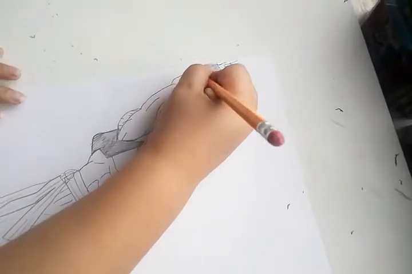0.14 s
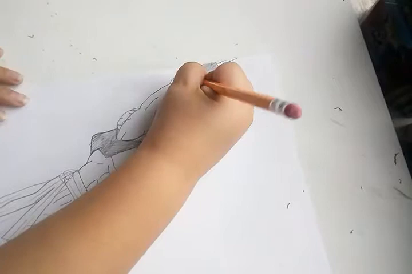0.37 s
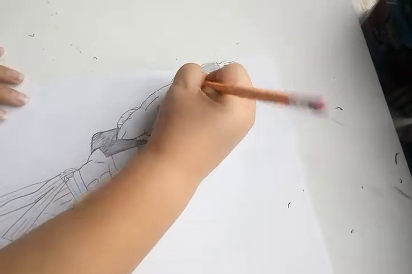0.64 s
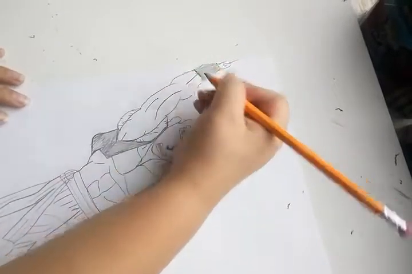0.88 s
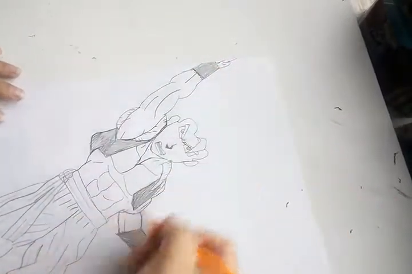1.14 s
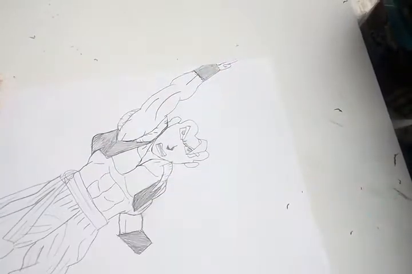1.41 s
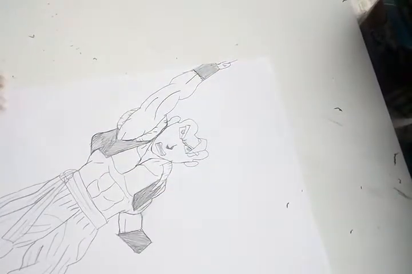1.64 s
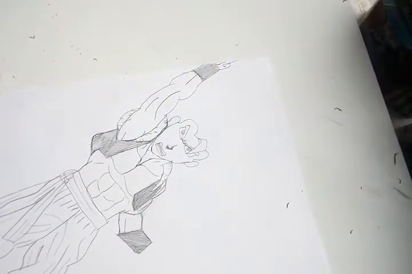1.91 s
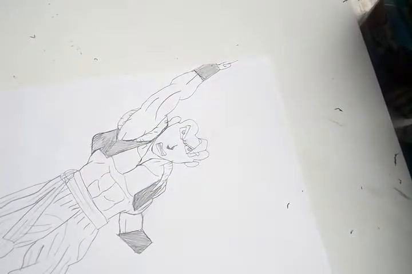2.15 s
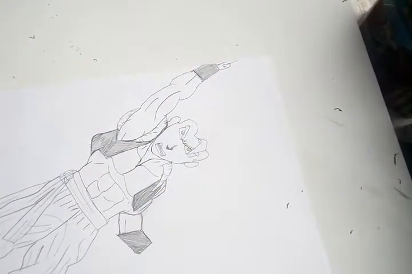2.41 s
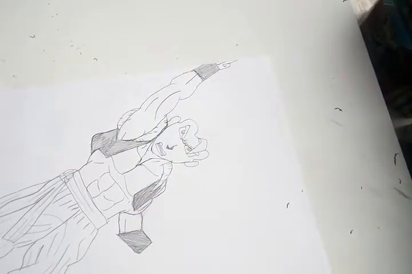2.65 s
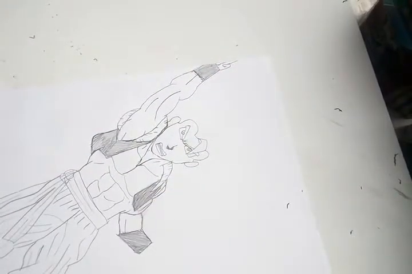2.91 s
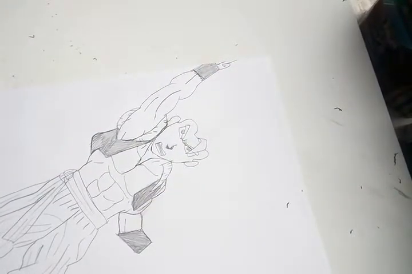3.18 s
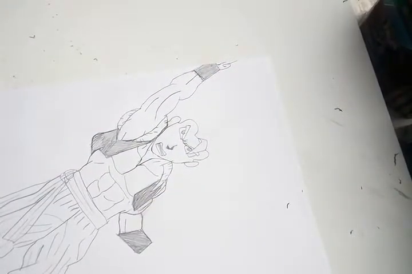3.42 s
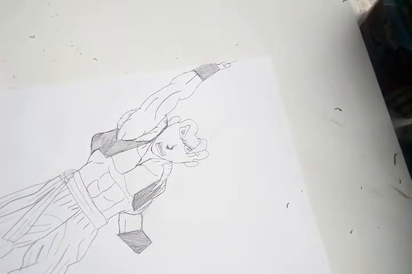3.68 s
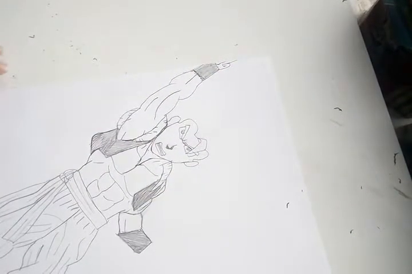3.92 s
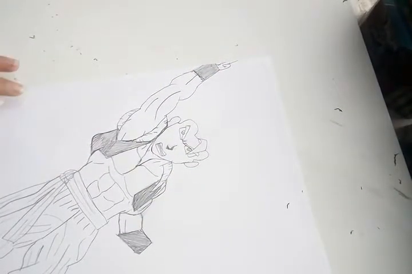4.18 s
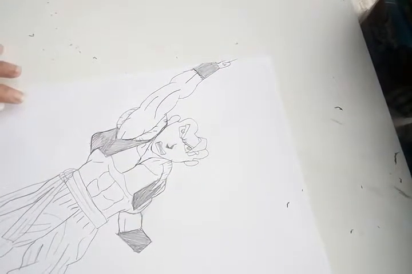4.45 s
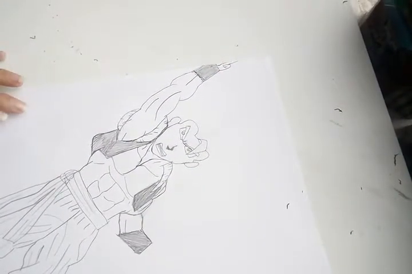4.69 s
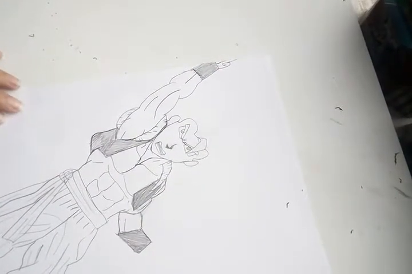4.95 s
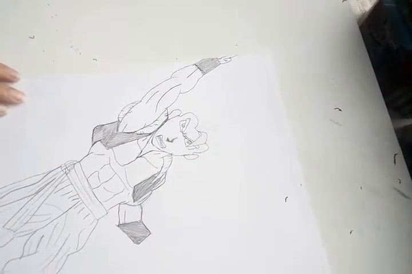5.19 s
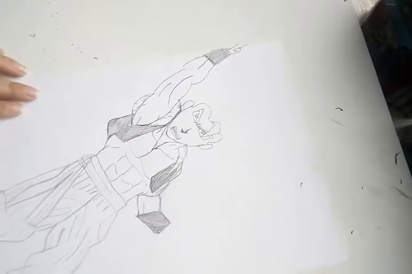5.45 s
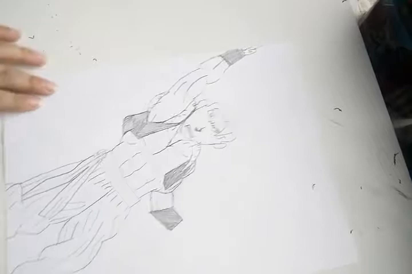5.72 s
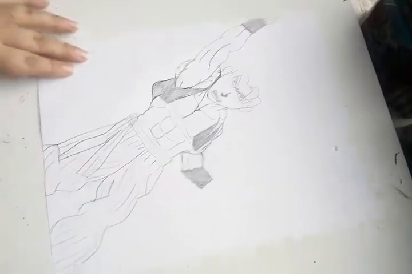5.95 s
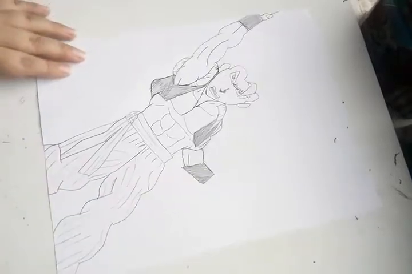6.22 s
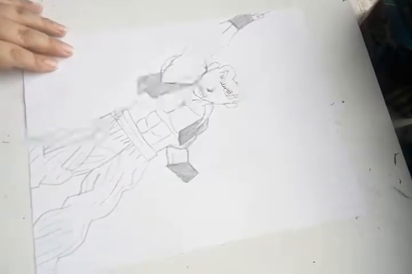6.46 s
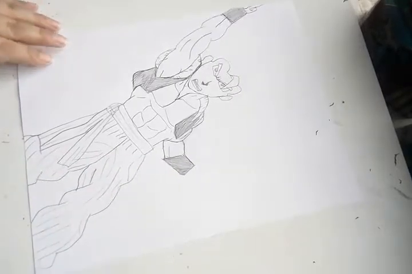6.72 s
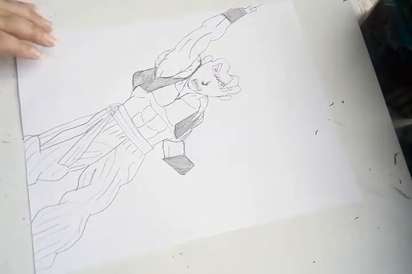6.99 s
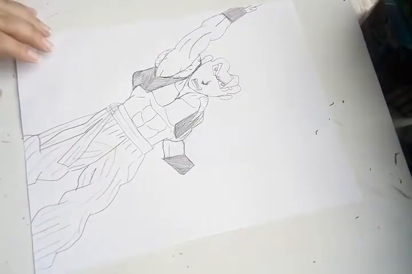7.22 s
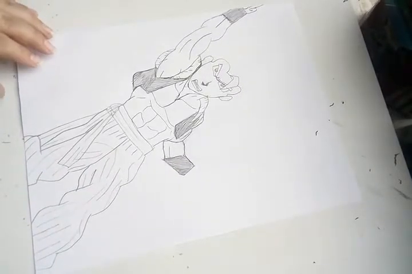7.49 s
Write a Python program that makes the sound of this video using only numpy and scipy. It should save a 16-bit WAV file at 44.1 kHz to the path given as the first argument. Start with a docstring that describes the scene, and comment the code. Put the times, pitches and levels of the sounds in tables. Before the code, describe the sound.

A quiet indoor room with low hum and faint hiss, microphone close above a desk. Soft papery rubbing comes first, then a small tap and a long near-silence. A sudden bright clatter of hard taps follows, with light rubbing, then scuffs and a burst of dull, heavy thuds and rumble as the camera is moved. The thuds weaken, leaving a small click-scuff and quiet.

```python
"""A quiet room, with the microphone in a camera housing close above a desk.
Room hum and rush and microphone hiss are shaped steady noise. A hand slides over drawing paper (friction
noise) and an arm drags on the desk (low resonances shaken by noise). A pencil and other small hard things
tap and clatter: bursts of contact noise that ring the thing and thump the desk. While the housing is shifted
it thuds in low jolts over a rumble, carried straight through the camera body."""
import sys
import numpy as np
from scipy import signal
from scipy.fft import rfft, irfft
from scipy.io import wavfile

SR = 44100
rng = np.random.default_rng(int(sys.argv[2]) if len(sys.argv) > 2 else 0)


def invert_db(level):
    """Linear amplitude ratio for a level in decibels (20 dB per decade), elementwise."""
    return 10 ** (np.asarray(level, dtype=float) / 20)


def materialize(psi):
    """Save the field psi as 16-bit PCM at rate SR to the path in sys.argv[1].

    A 1-D psi becomes a single channel; in a 2-D psi each row is a channel.
    """
    bounded = np.clip(np.atleast_2d(psi).T, -1, 1)
    quanta = np.round(bounded * 32767).astype(np.int16)
    wavfile.write(sys.argv[1], SR, quanta)


N = 335601  # length in samples

# Room hum and rush: [f/Hz, relative level/dB]
AIR_SPECTRUM = [(12, -51.5), (20, -35), (43, -2.5), (90, -7.5), (123, 0.5), (161, -10), (243, -10),
                (296, -13.5), (569, -17), (762, -18.5), (903, -20), (6600, -29), (8580, -50), (14500, -120)]
# Microphone hiss: [f/Hz, relative level/dB]
HISS_SPECTRUM = [(3880, -36), (6600, -8.5), (8080, -8.5), (12900, -9), (13600, -10), (15100, 3.5),
                 (16000, -8.5), (16200, -37)]
AIR_DB, HISS_DB = -57.5, -76.5  # rms levels
# The resting arm drags on the desk: [start t/s, length t/s, low resonance level/dB, high resonance level/dB]
ARM_DRAGS = [(.12, 0.57, -54.5, -67), (3.902, 0.25, -76, -56), (4.398, 0.58, -66, -61.5),
             (6.618, 0.3, -65, -61), (7.051, 0.38, -59, -65)]
DRAG_EDGE_S = 0.1
# Reverberation of the room: [f/Hz, time to fall 60 dB t/s]
ROOM_DECAY = [(100, 0.53), (400, 0.31), (2000, 0.33), (5000, 0.27), (8000, 0.22)]
ROOM_DB = -9.5  # reverberation against the direct sound
# Response of the dull microphone port: [f/Hz, gain level/dB]
MICROPHONE_RESPONSE = [(25, -16.5), (70, -1.5), (6500, -1), (7600, -15), (9000, -16.5), (13000, -17),
                       (15000, -11)]

# Strokes of skin over paper:
# [start t/s, length t/s, level halfway/dB, level change from start to end/dB, slide brightness/(dB per octave)]
PAPER_STROKES = [(0.221, .4, -58, 0, -1), (.79, .2, -61, 6, -4.5), (3.802, 0.34, -56, 12, -1.5),
                 (4.297, 0.94, -62.5, -8.5, -2.5), (5.126, 0.35, -56.5, -9.5, -4), (5.679, .14, -59, 3, 3),
                 (5.77, 0.28, -58, -10, 6)]
# Resonances of the sheet under the pencil hand: [f/Hz, width f/Hz, relative level/dB]
SHEET_RESONANCES = [(1000, 470, 7.5), (1510, 62, 8), (2000, 360, 6), (2793, 190, 0.5), (3660, 150, 5),
                    (4570, 170, 4), (5400, 250, -14.5)]
# Hiss of the sheet sliding on the desk: [f/Hz, relative level/dB]
SLIDE_SPECTRUM = [(300, 2), (700, 2.5), (1500, 1), (2700, 4), (4500, 4), (6400, -0.5), (7600, -13.5)]
STROKE_START_S, STROKE_STOP_S = 0.061, 0.043  # the hand speeds up, and stops more suddenly
LIFT_S = 0.7  # the pencil hand lifts off the sheet: strokes that start later ring it less
HELD_DB, FREE_DB = -1, -27  # ring of the sheet over the hiss, before and after that

# Hard taps: [t/s, strike level/dB, ring of the struck thing f/Hz, relative ring level/dB,
# level added to the desk modes below 500 Hz/dB]
HARD_TAPS = [(.571, -55, 1100, 5, -21), (1.2594, -36, 2650, 5, -9), (1.264, -49, 696, 16, -1),
             (2.096, -54, 640, -7, -5), (3.049, -56, 654, -18, -6.5), (3.76, -53.5, 1230, 1, -4),
             (3.982, -49.5, 3480, 7, -5), (3.994, -43, 1610, -12, -2), (4.0495, -17, 2100, -9, -11.5),
             (4.0659, -16, 3030, -6, -15), (4.0694, -17, 1960, 2, -8), (4.126, -16.5, 556, 3.5, -6),
             (4.142, -21.5, 3520, -13, -12.5), (4.1443, -16.5, 500, -6, -20),
             (4.153, -13, 2850, -24, -10.5), (4.221, -38, 2060, 8, 7.5), (4.796, -55.5, 3040, 3, 6.5),
             (4.806, -52.5, 500, 7, 0), (4.884, -54, 715, 6, 3.5), (5.471, -35, 1335, -32, -15),
             (6.204, -49.5, 2019, -7, 10), (6.43, -35.5, 3930, 3.5, -8)]
# Soft, dragging contacts: columns as for the hard taps
SOFT_SCUFFS = [(5.047, -42, 1560, 4, 7), (5.061, -31.5, 785, 1.5, -6), (5.07, -36, 1520, 6.5, -2.5),
               (5.092, -27.5, 397, 3, 1.5), (5.104, -32.5, 607, 5.5, 8.5), (6.439, -40.5, 4030, -11, 9.5),
               (6.452, -32, 2000, -5, -4), (6.463, -33.5, 1910, 2.5, 2), (6.47, -34, 2640, 4.5, 15)]
# Contact crack before its treble tilt: [f/Hz, relative level/dB]
CRACK_SPECTRUM = [(150, -18.5), (300, 1), (500, -0.5), (1000, -6.5), (3400, -9), (6000, -18),
                  (16000, -46.5)]
# Modes of the desk: [f/Hz, relative level/dB, time to fall 60 dB t/s]
DESK_MODES = [(105, 4, 0.11), (248, 1.5, 0.086), (351, -4, 0.088), (442, -6.5, 0.045), (767, -2.5, 0.038),
              (1240, -8.5, 0.024), (1590, -17.5, 0.1), (1980, -13.5, 0.058), (2100, -21, 0.043),
              (3400, -35.5, 0.067)]
# things that ring high crack brightly; heavy blows flatten the contact and dull it
TREBLE_DB, TREBLE_DB_PER_OCTAVE, DULL_DB_PER_DB = -1, 4, 0.29
# first bright touch; strongest where little rings on
TICK_DB, TICK_T60_S, TICK_DB_PER_RING_DB = -14, 0.013, -0.36

# A faint narrow whistle in the rubbing: (start t/s, length t/s, f/Hz, level/dB)
RUBBING_WHISTLE = (4, 1.5, 2746, -72)

# Rumble of the many small jolts while the camera is shifted: [t/s, level/dB]
RUMBLE_LEVEL = [(5.099, -59), (5.148, -27), (5.224, -29), (5.27, -24.5), (5.398, -32), (5.528, -21.5),
                (5.744, -30.5), (6.252, -54.5), (6.349, -53)]
# Sound carried through the camera body: [f/Hz, relative level/dB]
HOUSING_SPECTRUM = [(12, -29.5), (20, -2.5), (103, 9.5), (248, -2), (532, -28), (614, -37), (900, -50.5),
                    (1170, -77), (1980, -120)]
# Strong jolts of the housing: [crest t/s, swell level/dB, f/Hz, time between its -15 dB points t/ms]
HOUSING_JOLTS = [(5.143, -28, 110, 11), (5.164, -17, 129, 5.8), (5.188, -12.5, 200.5, 8.5),
                 (5.206, -15.5, 114.4, 7.7), (5.231, -13, 157, 7.6), (5.266, -18.5, 144, 20),
                 (5.302, -15, 89, 16.5), (5.325, -17, 78, 17), (5.358, -22, 199, 19),
                 (5.383, -13.5, 150, 5.5), (5.409, -9.5, 167, 9), (5.452, -13, 136, 5.8),
                 (5.466, -12, 147, 8.7), (5.586, -15, 121, 6), (5.628, -19, 128, 12),
                 (5.665, -19.5, 135, 14), (5.712, -18.5, 115, 17.2), (5.741, -22, 108, 17),
                 (5.803, -22.5, 113, 33), (5.842, -19, 127, 14.3), (5.877, -22, 89, 20),
                 (5.917, -20, 133.6, 10), (5.99, -29.5, 96, 37), (6.089, -29, 86.4, 35),
                 (6.176, -30.5, 80.6, 14), (6.482, -21.5, 109, 26), (6.514, -31, 105, 14),
                 (7.422, -36.5, 101, 10), (7.441, -36.5, 69, 28)]
JOLT_HALF = 2200  # samples either side of the crest
# the snap at a jolt's crest; stronger jolts snap harder
SNAP_DB, SNAP_DB_PER_DB, SNAP_SPREAD_DB = -16.5, 0.57, 3


def evened(x):
    """Scales to rms 1."""
    return x / np.sqrt(np.mean(x ** 2) + 1e-20)


def add(mix, start_s, sound):
    """Mixes a sound in at a time in seconds."""
    part = mix[max(round(start_s * SR), 0):][:len(sound)]
    part += sound[:len(part)]


def coloured(x, points):
    """Filters x by the gain curve through points (f/Hz, level/dB)."""
    f, db = np.transpose(points)
    hz = np.fft.rfftfreq(len(x), 1 / SR)
    gain = invert_db(np.interp(np.log(hz + 1), np.log(f + 1), db))
    return irfft(rfft(x) * gain, len(x))


def resonate(x, hz, width_hz):
    """One damped resonance, with a gain near 1 at its centre."""
    r = np.exp(-np.pi * width_hz / SR)
    pole = r * np.exp(2j * np.pi * hz / SR)
    return 2 * signal.lfilter([1 - r], [1, -pole], x).real


def lumps(length, rate_hz, depth_db):
    """A random level that wanders about rate_hz times a second."""
    knots = rng.standard_normal(int(length / SR * 400) + 2)
    place = np.arange(length) / SR * min(rate_hz, 399)
    return invert_db(depth_db * np.interp(place, np.arange(len(knots)), knots))


def eased(length, start, stop):
    """Times and a level that fades in, holds and fades out."""
    t = np.arange(0, length, 1 / SR)
    edge = np.clip(np.minimum(t / start, (length - t) / stop), 0, 1)
    return t, np.sin(np.pi / 2 * edge) ** 2


def air():
    """Steady hum and rush of the room, as shaped noise."""
    return invert_db(AIR_DB) * evened(coloured(rng.standard_normal(N), AIR_SPECTRUM))


def microphone_hiss():
    """Steady hiss of the microphone itself, as shaped noise."""
    return invert_db(HISS_DB) * evened(coloured(rng.standard_normal(N), HISS_SPECTRUM))


def drag(start, length, low_db, high_db):
    """Uneven friction of the arm shakes two low desk resonances."""
    t, ease = eased(length, DRAG_EDGE_S, DRAG_EDGE_S)
    grip = rng.standard_normal(len(t)) * lumps(len(t), 28, 1.1) * lumps(len(t), 10, 3.8)
    low = evened(resonate(resonate(grip, 126, 43), 89, 78)) * invert_db(low_db)
    high = evened(resonate(resonate(grip, 242.5, 33), 235, 65)) * invert_db(high_db)
    return start, (low + high) * ease


def room(x):
    """Sparse echoes of random sign, each band dying at its own speed."""
    echoes = np.zeros(SR)
    slots = np.arange(200, SR - 20, 20)  # one echo in each 20 samples
    echoes[slots + rng.integers(0, 20, len(slots))] = rng.choice([-1., 1.], len(slots))
    hz, t, bands = signal.stft(echoes, SR, nperseg=256)
    f, t60 = np.transpose(ROOM_DECAY)
    decay = invert_db(-60 * t / np.interp(hz, f, t60)[:, None])
    tail = signal.istft(bands * decay, SR, nperseg=256)[1]
    return signal.fftconvolve(x, tail / np.linalg.norm(tail))[:N]


def stroke(start, length, middle_db, change_db, tilt_db):
    """Fine friction grains hiss as skin slides, and ring the sheet where it is held down."""
    t, ease = eased(length, STROKE_START_S, STROKE_STOP_S)
    grains = rng.standard_normal(len(t)) * lumps(len(t), 79.5, 2.0) * lumps(len(t), 13, 1.2)
    ring = np.zeros(len(t))
    for hz, width_hz, db in SHEET_RESONANCES:
        ring += invert_db(db) * evened(resonate(resonate(grains, hz, width_hz), hz, 5 * width_hz))
    slide = coloured(coloured(grains, SLIDE_SPECTRUM), [(500, -2 * tilt_db), (8000, 2 * tilt_db)])
    ring_db = HELD_DB if start < LIFT_S else FREE_DB
    friction = evened(invert_db(ring_db) * evened(ring) + evened(slide))
    return start, friction * ease * invert_db(middle_db + change_db * (t / length - .5))


def desk_thump(t, thud_db, rise):
    """The weight of a contact sets the desk modes swinging; they die away one by one."""
    out = np.zeros(len(t))
    spot = rng.standard_normal((len(DESK_MODES), 2))  # each spot drives the modes differently
    for (spread, turn), (hz, db, t60) in zip(spot, DESK_MODES):
        level_db = db + 1.5 * spread + (thud_db if hz < 500 else -3)
        swell = 1 - np.exp(-t / (rise + 0.19 / hz))  # a mode needs part of a cycle to build up
        out += invert_db(level_db - 60 * t / t60) * swell * np.sin(2 * np.pi * (hz * t + turn))
    return out


def knock(strike_db, ring_hz, ring_db, thud_db, rise, t60):
    """A rattling contact force: heard as a crack, it rings the struck thing; its weight thumps the desk."""
    t = np.arange(SR // 2) / SR
    force = rng.standard_normal(len(t)) * lumps(len(t), 300, 1.08)
    onset = np.minimum(t / rise, 1)
    shape = onset * invert_db(-60 * t / t60)

    treble_db = TREBLE_DB + TREBLE_DB_PER_OCTAVE * np.log2(ring_hz / 2000)
    treble_db -= DULL_DB_PER_DB * (strike_db + 28.5)
    tilt = [(2500, 0), (5000, treble_db), (12000, treble_db - 7.5)]
    crack = evened(coloured(coloured(force, CRACK_SPECTRUM), tilt) * shape)

    width_hz = 0.2 * ring_hz / invert_db(0.47 * ring_db)  # little damping: loud and narrow
    ring = resonate(resonate(force, ring_hz, width_hz), ring_hz, 3.6 * width_hz)
    ring = evened(ring * shape * invert_db(-600 * t))
    out = np.sqrt(np.mean(shape ** 2)) * (invert_db(1.0) * crack + invert_db(ring_db - 6) * ring)

    tick = coloured(force, [(1500, -25), (5000, 6), (9000, -3), (15000, -11)]) * onset
    out += invert_db(TICK_DB + TICK_DB_PER_RING_DB * ring_db - 60 * t / TICK_T60_S) * tick
    return invert_db(strike_db) * (out + desk_thump(t, thud_db, rise))


def whistle(start, length, hz, db):
    """Noise in one narrow resonance."""
    t, ease = eased(length, .2, .12)
    tone = resonate(resonate(rng.standard_normal(len(t)), hz, 120), hz, 300)
    return start, invert_db(db) * ease * evened(tone)


def rumble():
    """Many small jolts run together: lumpy low noise that follows its level table."""
    s, db = np.transpose(RUMBLE_LEVEL)
    t = np.arange(s[0], s[-1], 1 / SR)
    force = rng.standard_normal(len(t)) * lumps(len(t), 45.2, 3.8) * lumps(len(t), 17, 4.1)
    sound = evened(coloured(force, HOUSING_SPECTRUM))
    return s[0], sound * invert_db(np.interp(t, s, db)) * signal.windows.tukey(len(t), .05)


def jolt(db, hz, ms):
    """A soft push: a low wave that swells and dies, with a short snap at its crest."""
    t = np.arange(-JOLT_HALF, JOLT_HALF) / SR
    turn = 2 * np.pi * (hz * t + rng.random())
    bell = np.exp(-(t / (0.00038 * ms)) ** 2)
    snap = np.exp(-abs(t / 0.002) ** 0.94) * np.cos(2.676 * turn)
    snap_db = SNAP_DB + SNAP_DB_PER_DB * (db + 17.5) + SNAP_SPREAD_DB * rng.standard_normal()
    return invert_db(db) * (bell * np.cos(turn) + invert_db(snap_db) * snap)


def housing():
    """Jolts over a lumpy rumble, carried straight through the camera body."""
    out = np.zeros(N)
    add(out, *rumble())
    for crest_s, *row in HOUSING_JOLTS:
        add(out, crest_s - JOLT_HALF / SR, jolt(*row))
    return out


def scene():
    """Desk sounds through the room and the dull microphone port, the housing direct, and the steady air."""
    desk = np.zeros(N)
    for row in ARM_DRAGS:
        add(desk, *drag(*row))
    for row in PAPER_STROKES:
        add(desk, *stroke(*row))
    for s, *row in HARD_TAPS:
        add(desk, s, knock(*row, rise=0.00099, t60=0.067))
    add(desk, *whistle(*RUBBING_WHISTLE))
    for s, *row in SOFT_SCUFFS:
        add(desk, s, knock(*row, rise=0.0033, t60=0.076))
    heard = coloured(desk + invert_db(ROOM_DB) * room(desk), MICROPHONE_RESPONSE)
    return (heard + housing() + air() + microphone_hiss())[None]


def low_pass(x):
    """Removes everything above the highest recorded frequency."""
    return signal.sosfilt(signal.butter(12, 16490, fs=SR, output="sos"), x)


def record(dry):
    """Takes the finished mix to its stored form."""
    return low_pass(dry)


dry = scene()
out = record(dry)
materialize(out)
```